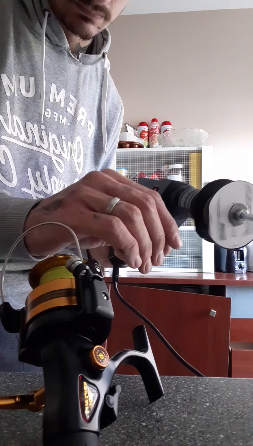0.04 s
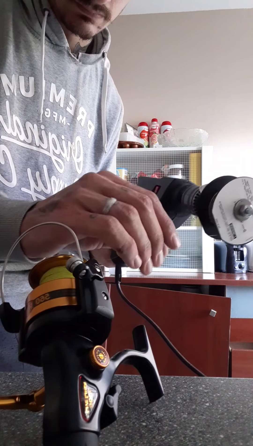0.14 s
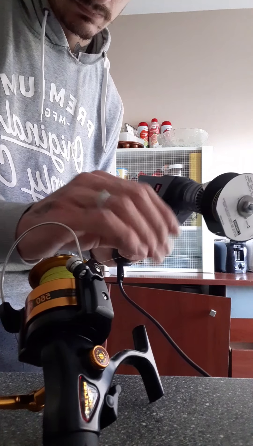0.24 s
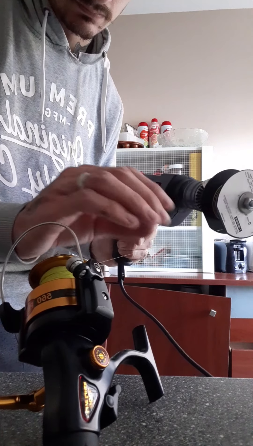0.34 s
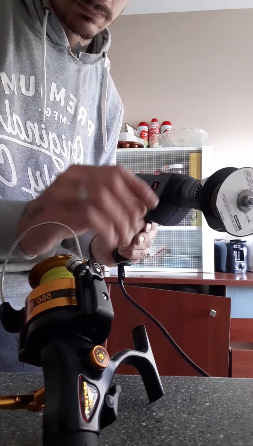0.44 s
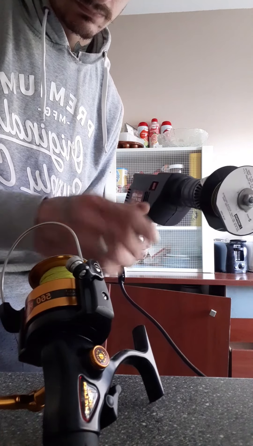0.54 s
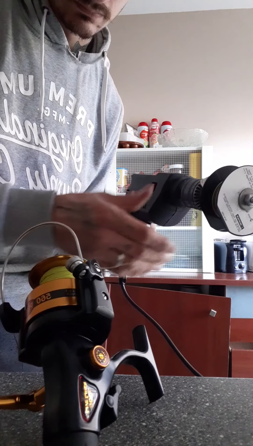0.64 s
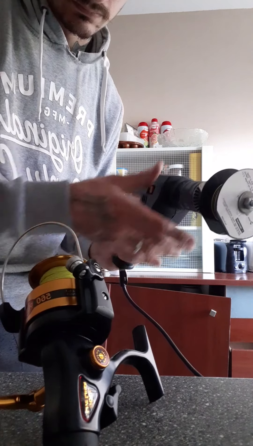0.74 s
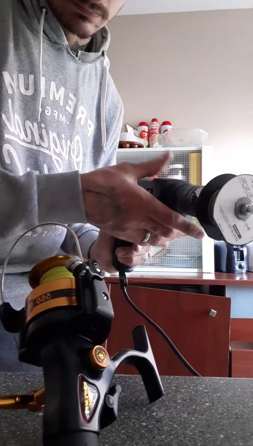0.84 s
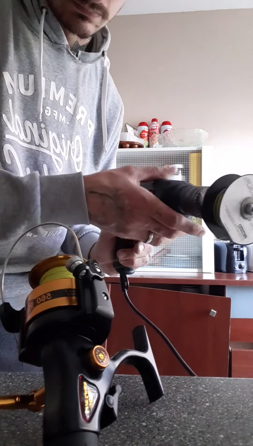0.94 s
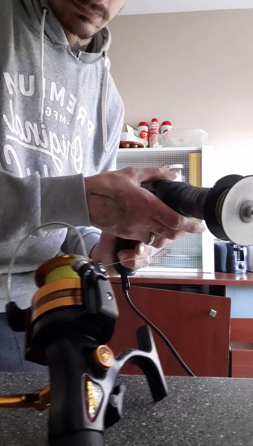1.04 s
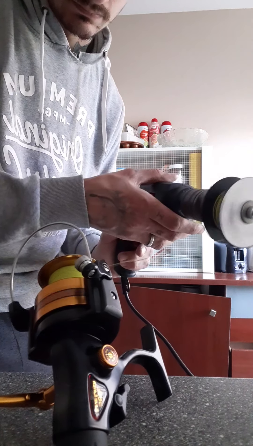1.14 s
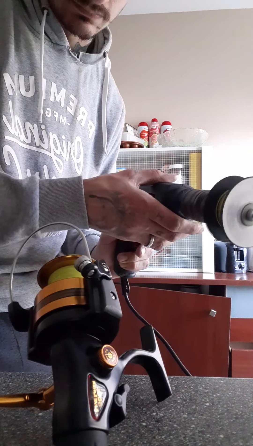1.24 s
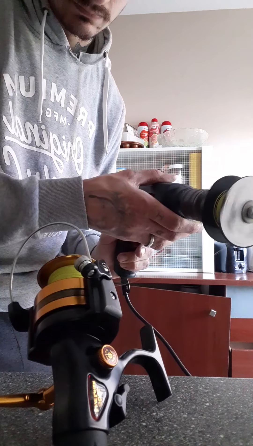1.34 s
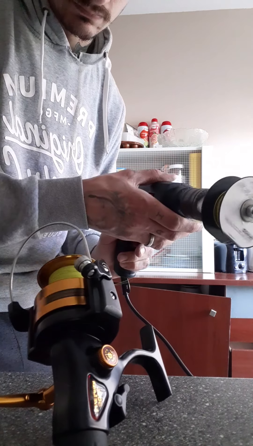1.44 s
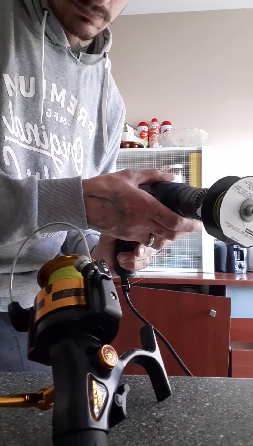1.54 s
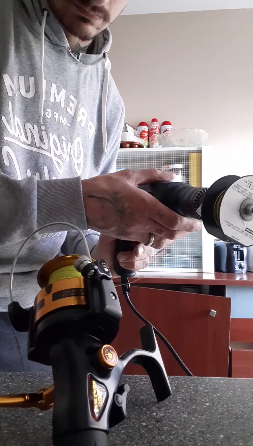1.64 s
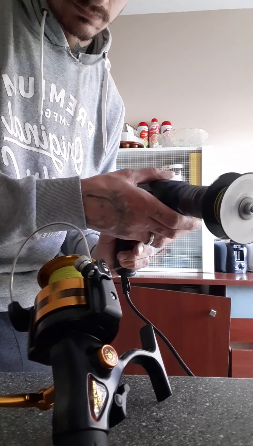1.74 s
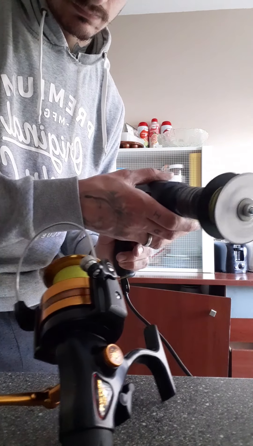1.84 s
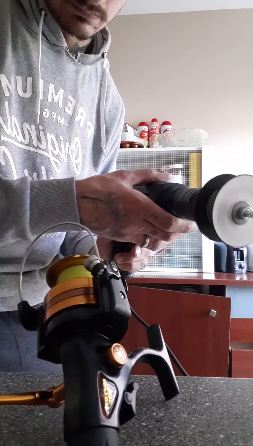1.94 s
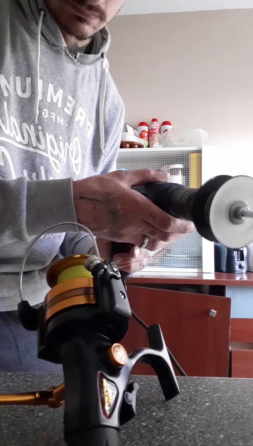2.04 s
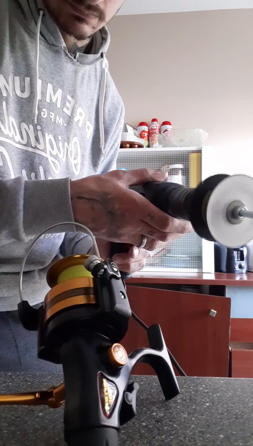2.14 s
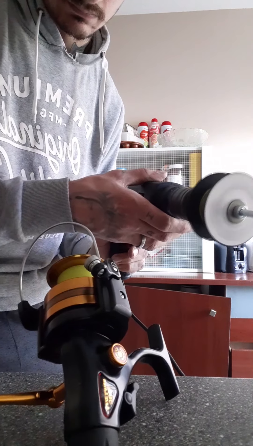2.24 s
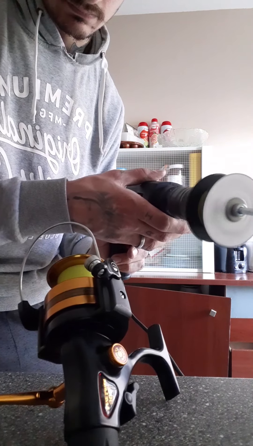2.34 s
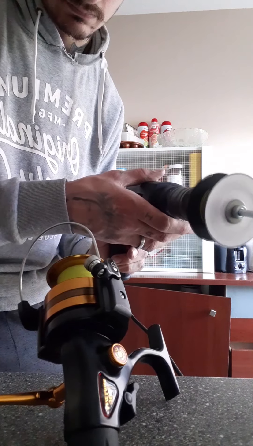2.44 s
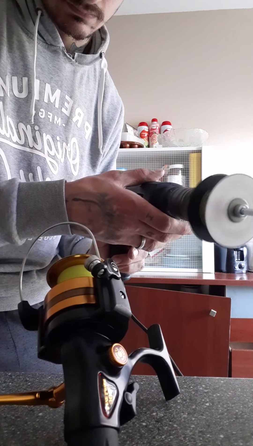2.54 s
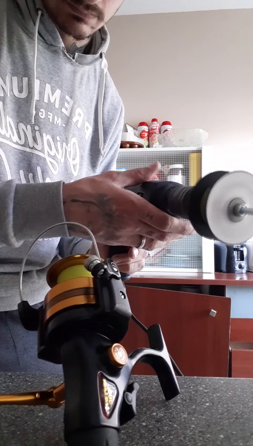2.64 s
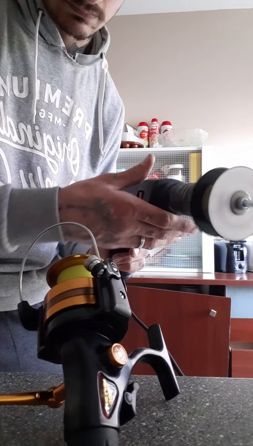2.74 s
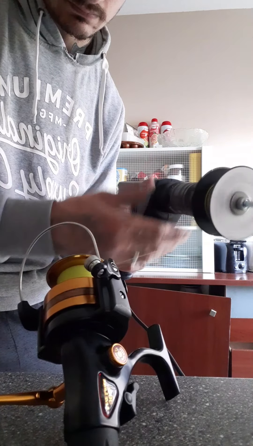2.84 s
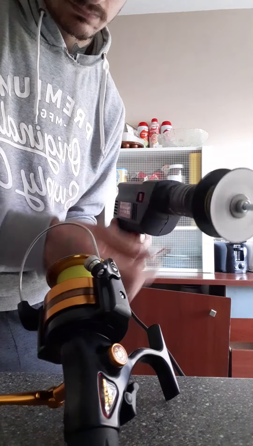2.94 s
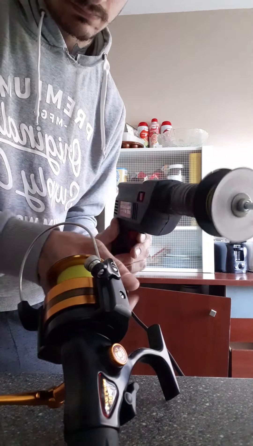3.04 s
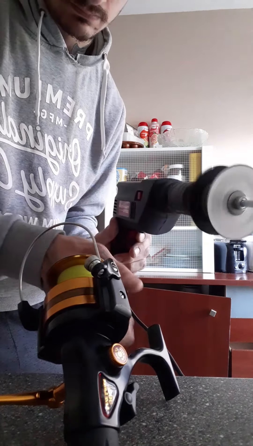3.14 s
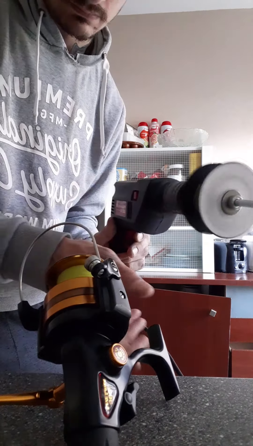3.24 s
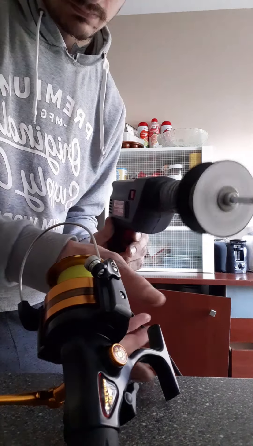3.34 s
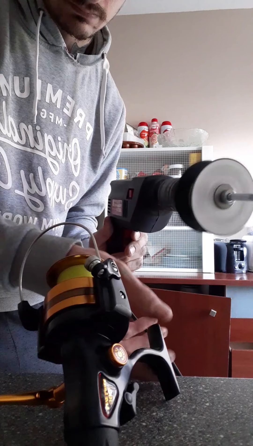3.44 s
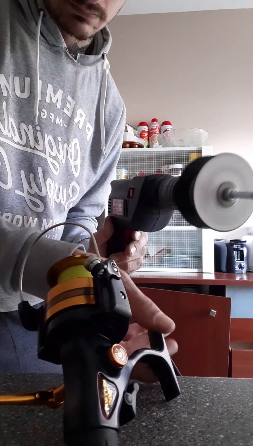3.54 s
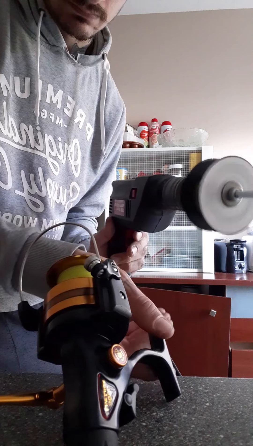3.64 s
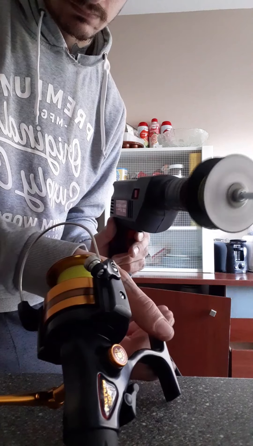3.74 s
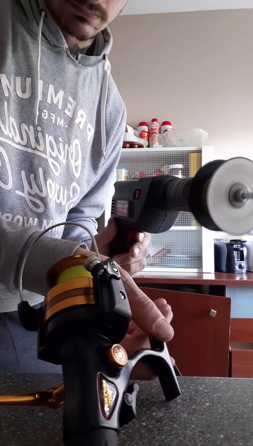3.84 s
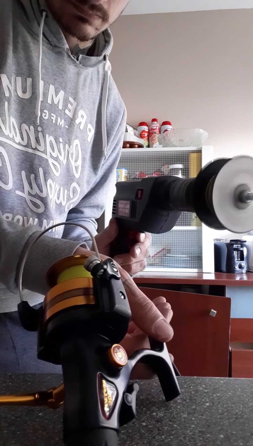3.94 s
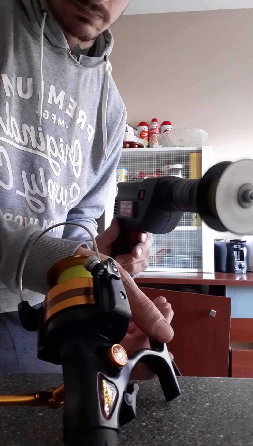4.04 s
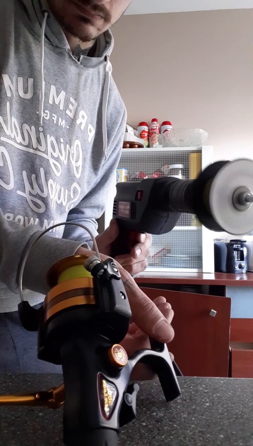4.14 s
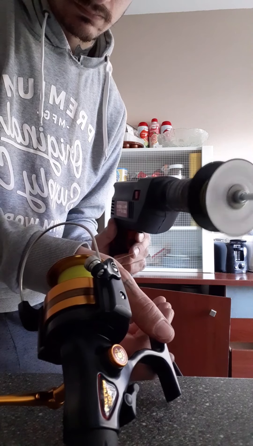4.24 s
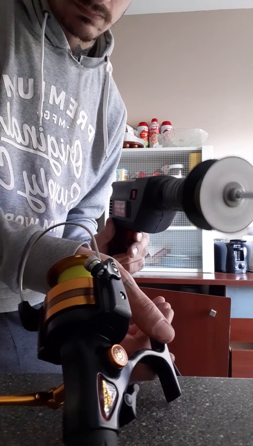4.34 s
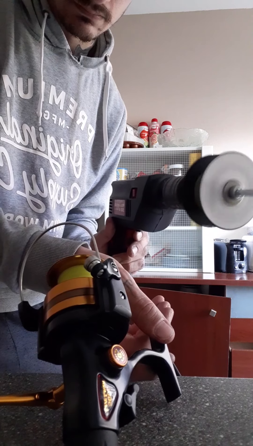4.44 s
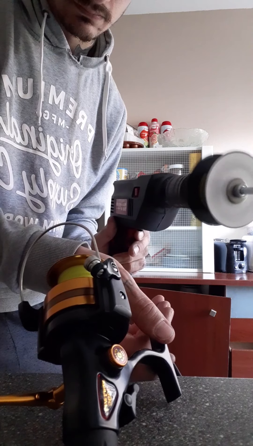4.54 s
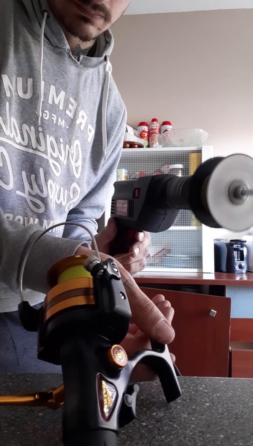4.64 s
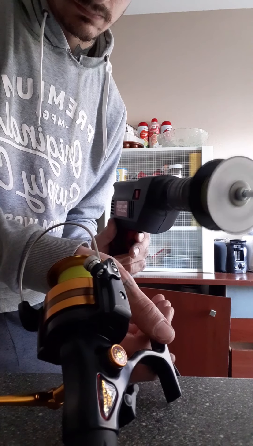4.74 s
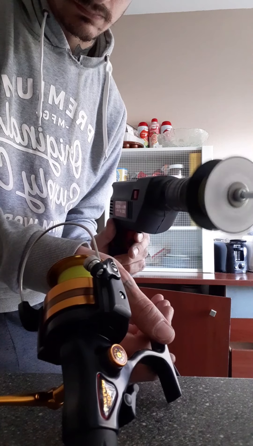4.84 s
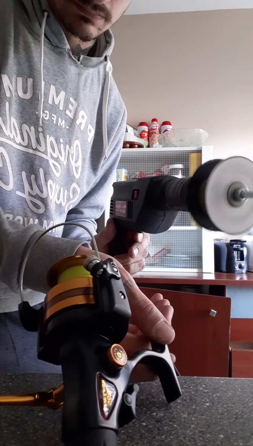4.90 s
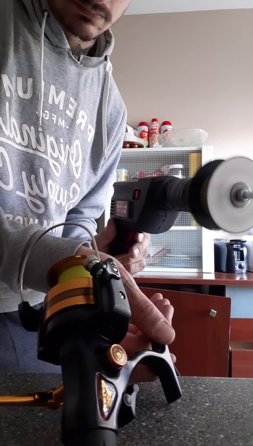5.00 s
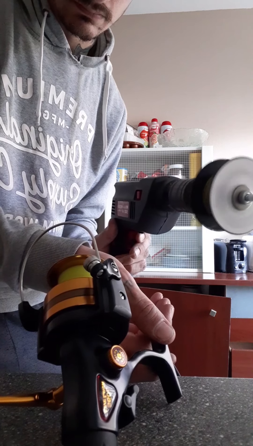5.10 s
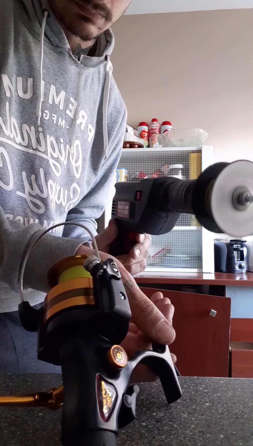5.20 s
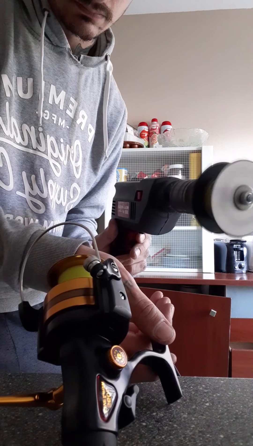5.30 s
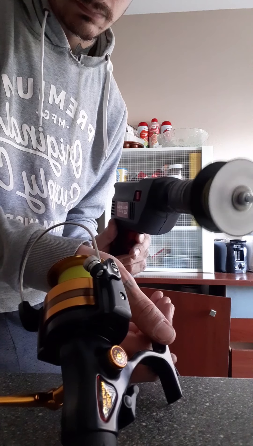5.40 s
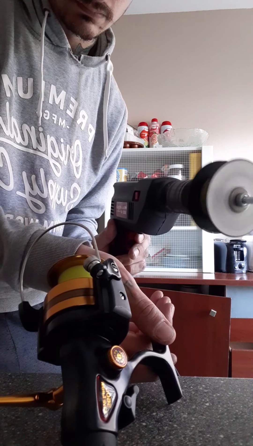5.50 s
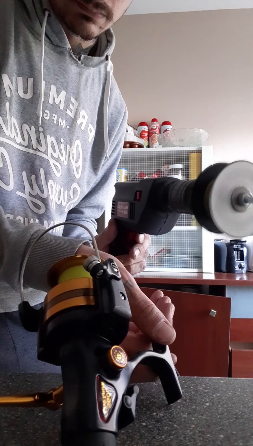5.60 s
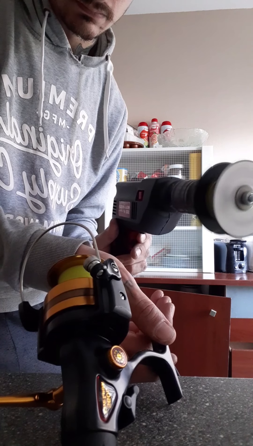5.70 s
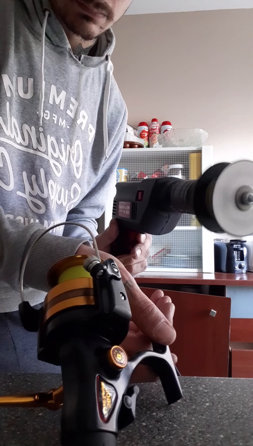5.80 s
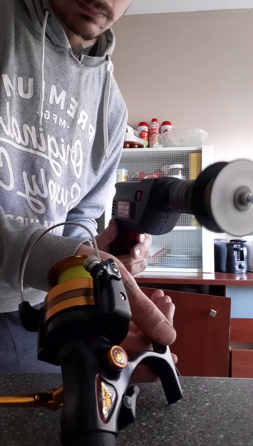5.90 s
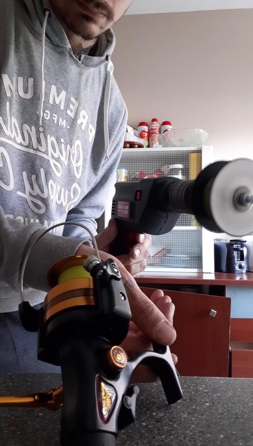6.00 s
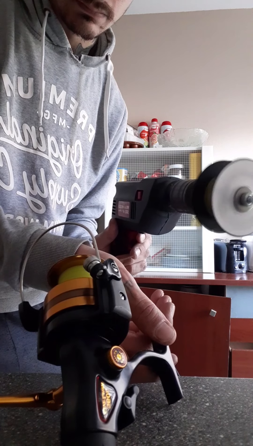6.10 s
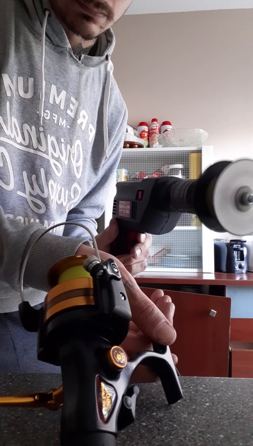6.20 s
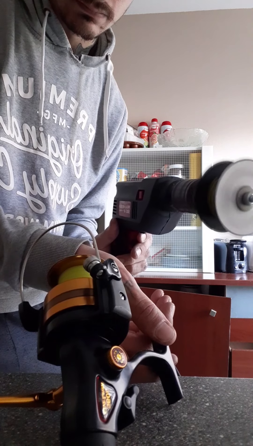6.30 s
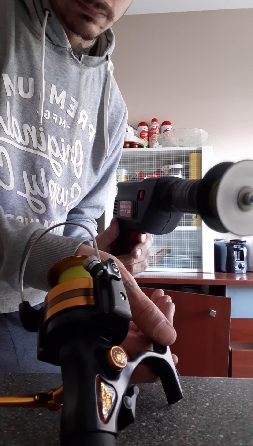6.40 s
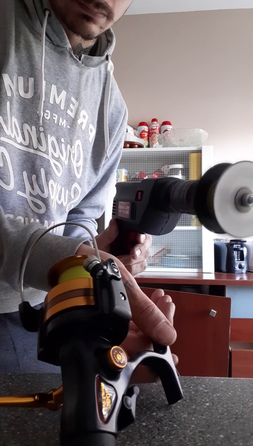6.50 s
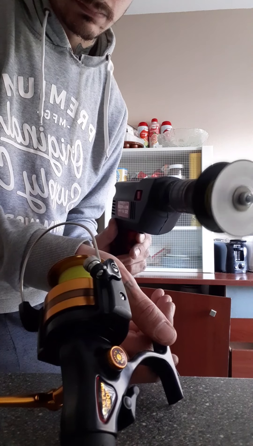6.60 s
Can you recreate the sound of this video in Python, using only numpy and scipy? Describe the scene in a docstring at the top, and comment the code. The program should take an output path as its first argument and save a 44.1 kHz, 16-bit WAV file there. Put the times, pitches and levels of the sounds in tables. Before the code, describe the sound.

A small quiet room, phone microphone close to a corded drill; the drill is in the right channel, only faint hiss in the left. At 0 s the motor is already coasting down, its rasp and falling whine thinning to sharp metallic tooth knocks by about 0.12 s. Quiet room tone follows, with a tiny trigger touch at 0.8 s. A dull slack rub at 0.95 s leads into a short rising whirr, peaking near 1.15 s and falling to separate ticks by 1.46 s. Another rub at 1.66 s, then from 1.73 s the drill spins up and stays on: gritty broadband scrape, bright wavering whine, ringing gears, fan rumble and rapid spool throb with small hoots. Pitch rises to 2.6 s, sags around 3.0 s, climbs again, dips briefly near 3.97 s, then holds high and slightly unsteady, edging upward, still running at about 6.6 s.

```python
"""A corded drill turns a spool of fishing line in a small room, close to a phone, over quiet air and hiss.
It opens coasting to rest: scraping, whining brushes and humming gears thin out to knocks of single teeth.
A finger settles on the trigger, a dull rub takes up slack, and one short burst spins up and coasts out.
Then the drill runs on: noise scrapes, bar-rate tones whine, gear tones swell through fixed resonances,
filtered friction rings a gear wheel and the case, and the off-centre spool hoots once a turn."""
import sys
import numpy as np
from scipy import signal
from scipy.fft import rfft, irfft
from scipy.io import wavfile
from scipy.ndimage import uniform_filter1d

SR = 44100
rng = np.random.default_rng(int(sys.argv[2]) if len(sys.argv) > 2 else 0)


def waveform_to_disk(signal):
    """Save audio, clipped to [-1, 1], as 16-bit WAV at the path in sys.argv[1]."""
    frames = np.transpose(np.atleast_2d(signal))
    scaled = np.clip(frames, -1, 1) * 32767
    samples = np.round(scaled).astype(np.int16)
    wavfile.write(sys.argv[1], SR, samples)


N = 293706
T = np.arange(N) / SR
HZ = np.maximum(np.arange(N // 2 + 1) * SR / N, 1)

# Levels in the right channel are set ahead of its final doubling; the left channel's hiss is not doubled.
# Spectra are relative shapes.
# quiet room spectrum: f/Hz, level per Hz/dB
AMBIENCE_SPECTRUM = [(18, -61.5), (30, -31.5), (90, -12), (124, -6.5), (149, -14), (221, -7), (336, -11.5),
                     (600, -16.5), (721, -4), (822, -14), (1860, -21), (5170, -21.5), (8300, -38.5),
                     (12600, -26), (16000, -22.5)]
# hiss of the idle left channel: f/Hz, level per Hz/dB
HISS_SPECTRUM = [(25, -5), (60, -4), (125, -1), (500, -9), (2000, -14.5), (5000, -17), (9000, -28),
                 (13000, -10), (16000, -18)]
# trigger pulls: pull t/s, end of spin-up t/s; the last one is held on
TRIGGER_PULLS = [(-.44, -.23), (.972, 1.155), (1.725, 1.9)]
# speed while the finger holds and eases the trigger: t/s, bar rate f/Hz
HELD_SPEED = [(1.9, 1513), (1.95, 1855), (2.06, 2278), (2.28, 3038), (2.55, 3655), (2.64, 3667),
              (3.04, 2089), (3.09, 2351), (3.28, 2932), (3.58, 3455), (3.8, 3592), (3.97, 2925),
              (4.01, 3388), (4.3, 3955), (4.51, 4137), (4.91, 4248), (4.99, 3967), (5.17, 3893),
              (5.41, 4125), (5.57, 4000), (5.93, 4378), (6.66, 4538)]
# commutator whine: multiple of the bar rate, level/dB, roughness 0-1
WHINE_LINES = [(1, -14, 0.44), (2, -10.5, 0.32), (3, -11.5, 0.48), (4, -14, 0.9)]
# how well the brush holders pass the whine to the housing: f/Hz, level/dB
HOLDER_RESPONSE = [(1500, -11), (2300, -7.5), (3000, -3), (4400, 3), (6300, 0), (7500, 2), (9000, -10.5),
                   (11000, -3.5), (13000, -1), (16000, -0.5)]
# what the housing radiates: f/Hz, level per Hz/dB
HOUSING_RESPONSE = [(300, -50.5), (600, -6.5), (1000, -5.5), (1400, -2.5), (2100, -3.5), (3000, -3.5),
                    (3700, 1), (4700, -2), (6800, -2), (8600, -8), (10300, -4), (11800, -0.5),
                    (13500, -1.5), (16000, -7.5)]
# housing resonances: f/Hz, width f/Hz, level relative to the broad response/dB
HOUSING_MODES = [(777, 87, -14), (2600, 28, 4), (2918, 188, 3), (3155, 40, 4), (4870, 310, 0.5),
                 (5710, 410, -0.5), (14400, 970, -4.5)]
# the clearest knocks of gear teeth at low speed: t/s, level ahead of filtering/dB
TOOTH_KNOCKS = [(0.0044, -15), (0.0246, -14.5), (0.0832, -21.5), (0.1222, -22.5), (0.9963, -23.5),
                (1.0168, -20.5), (1.3674, -18), (1.3854, -18), (1.4045, -14.5), (1.428, -15), (1.4599, -19),
                (1.7434, -25), (1.7818, -15.5)]
# cooling fan and shaking body: f/Hz, level per Hz/dB
RUMBLE_SPECTRUM = [(25, -29), (48, -20.5), (65, -5.5), (100, -3), (125, -4), (165, -5), (240, 3),
                   (300, -2.5), (380, 1), (520, -3), (800, -4), (1600, -37.5)]
# gear and armature tones: multiple of the motor turn, level/dB
GEAR_TONES = [(2.4, -21.5), (5, -19), (10, -24.5), (12, -21), (17, -22)]
# fixed gearbox resonances that the gliding tones pass through: f/Hz, level/dB
GEARBOX_RESPONSE = [(150, -26), (350, -8), (500, -13), (660, -6), (750, -1), (820, -5), (860, -14),
                    (915, 1), (960, 0), (1050, -11), (2000, -7), (2200, -3), (3000, -3)]
# a finger settles on the trigger: t/s, level ahead of filtering/dB
TRIGGER_TOUCH = [(.815, -63)]
# the dull rub of the motor taking up slack: t/s, level ahead of filtering/dB
SLACK_RUBS = [(.951, -42), (.966, -42.5), (1.659, -50.5), (1.672, -41), (1.705, -38)]

AMBIENCE_DB, HISS_DB = -70.5, -78.5
BARS, GEAR_RATIO, TEETH = 24, 9.6, 23  # commutator bars, motor turns per spool turn, output teeth
# speed counts commutator bars passing a brush; a pull draws it towards PULL_HZ, friction brakes it evenly
PULL_HZ, SPIN_UP_S, COAST_HZ_PER_S = 1979, .115, 4300
# bar rate to which the growth laws refer
CRUISE_HZ = 4200
# the scrape grows quickly up to a knee speed and slowly beyond it
SCRAPE_DB, SCRAPE_KNEE_HZ, SCRAPE_POWER = -19, 1073, 0.34
# scrape boost under full pull, and equal cut while coasting
DRIVE_DB = 0.5
# the whine rides on the scrape, stands out more with speed and wavers slowly
WHINE_DB, WHINE_POWER, WHINE_WAVER_DB = -5, 0.28, 1.1
# the bearings rumble evenly from this bar rate on
BEARING_DB, BEARING_HZ = -55.5, 600
# fan level at cruising speed, its growth with speed and its flutter
FAN_DB, FAN_POWER, FAN_FLUTTER_DB = -44, 2.27, 1.86
# a second hand steadies the drill at first; the fan's rumble is stronger until it lets go
HAND_OFF_S, HAND_FADE_S, HAND_DB = 2.8, .06, 3.5
# the body shudders as the motor gathers speed, most strongly this long after a pull
SHUDDER_DB, SHUDDER_S = -43.5, 0.1
# growth of the gear tones and of the spool's hoot with speed
GEAR_POWER, THROB_POWER = 0.75, 0.23
TOP_HZ = 15900  # top of the phone's passband


def undb(db):
    """Turn decibels into gain."""
    return 10 ** (np.asarray(db) / 20)


def unit(x):
    """Scale to a standard deviation of 1."""
    return x / np.std(x)


def noise():
    """White noise with rms 1."""
    return rng.standard_normal(N)


def curve(rows, axis=1):
    """Join one column of a table by straight lines in time."""
    rows = np.array(rows)
    return np.interp(T, rows[:, 0], rows[:, axis])


def walk(rate):
    """Smooth random drift with spread 1, mostly slower than `rate` in Hz."""
    points = 2 ** 14
    t = np.linspace(0, T[-1], points)
    hz = np.arange(points // 2 + 1) / T[-1]
    spectrum = rfft(rng.standard_normal(points)) / (1 + (hz / rate) ** 4)
    return np.interp(T, t, unit(irfft(spectrum)))


def response(points):
    """Draw a gain curve through f/Hz, level/dB points on a logarithmic frequency axis."""
    hz, db = np.transpose(points)
    return undb(np.interp(np.log(HZ), np.log(hz), db))


def resonance(hz, width_hz):
    """Response of one damped mode, gain 1 at its centre."""
    return 1 / (1 + 1j * (HZ ** 2 - hz ** 2) / (HZ * width_hz))


def colour(x, gain):
    """Filter by a response, keeping the power of white noise."""
    level_gain = gain / np.sqrt(np.mean(np.abs(gain) ** 2))
    # centre the impulse response, so that the filter adds no delay
    kernel = np.roll(irfft(level_gain, N), 8192)[:16385]
    return signal.fftconvolve(x, kernel, mode="same")


def bursts(rows, decay_s):
    """Place a dying noise burst at each t/s, level/dB row."""
    envelope = np.zeros(N)
    for s, db in rows:
        start = max(int(s * SR), 0)
        envelope[start:] += undb(db) * np.exp(-np.minimum(T[:N - start] / decay_s, 50))
    return envelope * noise()


def ambience():
    """The quiet room is steady noise with its own spectrum."""
    return undb(AMBIENCE_DB) * colour(noise(), response(AMBIENCE_SPECTRUM))


def hiss():
    """The idle channel carries only faint steady noise."""
    return undb(HISS_DB) * colour(noise(), response(HISS_SPECTRUM))


def speed():
    """Bar rate: each pull spins the motor up, then it coasts to rest; on the last pull the finger steers it."""
    hz = np.zeros(N)
    for pull, release in TRIGGER_PULLS:
        driven = PULL_HZ * (1 - np.exp(-np.clip(T - pull, 0, release - pull) / SPIN_UP_S))
        hz = np.maximum(hz, driven - COAST_HZ_PER_S * np.maximum(T - release, 0))
    return np.where(T < HELD_SPEED[0][0], hz, curve(HELD_SPEED))


def effort(bar_hz):
    """Towards +1 while the motor pulls hard, 0 at steady speed, -1 while it coasts."""
    gaining = uniform_filter1d(np.gradient(bar_hz) * SR, size=4096)
    return np.clip(gaining / COAST_HZ_PER_S, -1, 1)


def scrape(turns, bar_hz, slap_db, grain_db, flicker_db):
    """Gritty friction that surges as each output tooth engages, most deeply at low speed."""
    tooth = turns * TEETH / GEAR_RATIO
    size = undb(4.8 * rng.standard_normal(4096))[tooth.astype(int)]
    surge = np.exp(-(tooth % 1) / .22)
    slap = undb(slap_db) * size * surge / (1 + bar_hz / 2500)
    # each grain of grit lasts 8 samples
    grain = np.repeat(rng.standard_normal(N // 8 + 1), 8)[:N]
    grit = undb(grain_db * grain)
    return unit(noise() * grit * (1 + slap)) * undb(flicker_db * walk(41.7))


def whine(turns, bar_hz, jitter, uneven, patchy_db):
    """Brushes tick over the bars; uneven bars and bounce spread each line into a skirt, most at low speed."""
    bounce = np.clip(1.25 - bar_hz / 4200, 0, .7)
    phase = 2 * np.pi * BARS * turns + jitter * walk(30) + .7 * bounce * walk(80)
    runout = 1 + uneven * np.cos(2 * np.pi * turns + 2 * walk(11))
    lines = 0
    for k, db, rough in WHINE_LINES:
        angle = k * phase
        in_step = (runout + rough * walk(170)) * np.sin(angle)
        out_of_step = rough * walk(170) * np.cos(angle)
        # the topmost lines stand out only once the brushes run smoothly
        smeared_db = 6 * bounce * np.clip((k * bar_hz - 8000) / 2000, 0, 1)
        lines = lines + undb(db - smeared_db + patchy_db * walk(16)) * (in_step + out_of_step)
    return colour(np.sqrt(2) * lines, response(HOLDER_RESPONSE))


def housing(x):
    """The housing radiates the brushes through a broad response with added resonant modes."""
    modes = sum(undb(db) * resonance(hz, width) for hz, width, db in HOUSING_MODES)
    return colour(x, response(HOUSING_RESPONSE) * (1 + modes))


def tooth_knocks(knocks):
    """Single gear teeth strike as sharp cracks, brightest around 5.5 kHz."""
    bright = [(500, -16), (3800, -4.5), (5500, 9.5), (9000, -0.5), (13500, 4.5), (16000, -7)]
    return undb(-2) * colour(knocks, response(bright))


def wheel(friction, knocks, spool_turns, ring_db, low_ring_db):
    """A steel gear rings; its lobes sweep past the listener, so the tone splits in two as it spins."""
    lobes = np.sqrt(2) * np.cos(2 * np.pi * 4.5 * spool_turns)
    ring = colour(friction + undb(3.5) * knocks, resonance(7530, 34) * resonance(7440, 300))
    # the lower mode is damped while the teeth rub, and rings on freely after a knock
    rubbed = undb(low_ring_db) * colour(friction, resonance(4770, 150) * resonance(4770, 300))
    struck = undb(-11) * colour(knocks, resonance(4760, 16) * resonance(4760, 400))
    return undb(ring_db) * ring * lobes + rubbed + struck


def case_modes(friction):
    """The friction excites the lower modes of the case: a narrow drone and a broader tone."""
    drone = undb(-34.5) * colour(friction, resonance(429, 4.8) * resonance(500, 120))
    case = undb(-25.0) * colour(friction, resonance(1255, 200) * resonance(1284, 280))
    return drone + case


def rumble(bar_hz):
    """The bearings roll, the fan blows harder with speed, and the body shudders briefly after each pull."""
    rolling = undb(BEARING_DB) * np.minimum(bar_hz / BEARING_HZ, 1)
    steadied = (1 - np.tanh((T - HAND_OFF_S) / HAND_FADE_S)) / 2
    fan_db = FAN_DB + HAND_DB * steadied + FAN_FLUTTER_DB * walk(11)
    blowing = undb(fan_db) * (bar_hz / CRUISE_HZ) ** FAN_POWER
    ages = [np.maximum(T - pull, 0) / SHUDDER_S for pull, _ in TRIGGER_PULLS]
    shudder = undb(SHUDDER_DB) * sum((age * np.exp(1 - age)) ** 4 for age in ages)
    level = np.sqrt(rolling ** 2 + blowing ** 2 + shudder ** 2)
    return level * colour(noise(), response(RUMBLE_SPECTRUM))


def gears(turns, bar_hz, wobble, patchy_db):
    """Meshing tones swell in the resonances of the gearbox and throb with the spool."""
    tones = 0
    for k, db in GEAR_TONES:
        ring_db = np.interp(k * bar_hz / BARS, *np.transpose(GEARBOX_RESPONSE))
        angle = 2 * np.pi * k * turns + .4 * walk(25)
        tones = tones + undb(db + ring_db + patchy_db * walk(9.4)) * np.sin(angle)
    return np.sqrt(2) * tones * wobble * (bar_hz / CRUISE_HZ) ** GEAR_POWER


def throb(spool_turns, bar_hz, hz, db):
    """The off-centre spool loads the gearbox once a turn, and each time it gives a short bent hoot."""
    angle = 2 * np.pi * spool_turns
    swell = ((1 + np.sin(angle)) / 2) ** 2 * undb(2 * walk(12))
    bend = 1.6 * np.sin(angle + 1) + 1.2 * walk(14)
    tone = np.sin(2 * np.pi * hz * T + bend)
    return undb(db) * unit(swell * tone) * (bar_hz / CRUISE_HZ) ** THROB_POWER


def trigger_touch():
    """A finger settling on the trigger gives a tiny click through a broad resonance."""
    return colour(bursts(TRIGGER_TOUCH, decay_s=.006), resonance(4800, 2200) ** 2)


def slack_rubs():
    """The motor taking up slack rubs as slowly dying noise with little above 8 kHz."""
    dull = [(150, -22), (450, -4), (1250, 9), (2200, 3.5), (5200, 8.0),
            (8500, -13), (13000, -7), (16000, -13)]
    return colour(bursts(SLACK_RUBS, decay_s=0.17), response(dull))


def room(x, t60_s, wet_db):
    """Close walls return a short dense tail, which dies sooner in the treble."""
    t = T[:SR]
    low_pass = signal.butter(2, 6000, fs=SR, output="sos")
    high_pass = signal.butter(2, 6000, "high", fs=SR, output="sos")
    low = signal.sosfilt(low_pass, rng.standard_normal(SR)) * 1000 ** (-t / t60_s)
    high = signal.sosfilt(high_pass, rng.standard_normal(SR)) * 1000 ** (-t / (.8 * t60_s))
    tail = (low + high) * (t > .003)  # the walls answer after 3 ms
    wet = undb(wet_db)
    reflected = signal.fftconvolve(x, tail / np.linalg.norm(tail))[:N]
    return (x + wet * reflected) / np.hypot(1, wet)


def scene():
    """Motor speed drives the layers; the right channel carries the scene, the left only hiss."""
    bar_hz = speed()
    turns = np.cumsum(bar_hz) / SR / BARS
    spool_turns = turns / GEAR_RATIO
    wobble = 1 + .55 * np.sin(2 * np.pi * spool_turns)

    # near standstill the steady scrape gives way to single knocks
    knee = bar_hz / np.hypot(bar_hz, SCRAPE_KNEE_HZ)
    level = undb(SCRAPE_DB) * knee * (bar_hz / CRUISE_HZ) ** SCRAPE_POWER
    rubbing = scrape(turns, bar_hz, slap_db=2.5, grain_db=1.5, flicker_db=1.0)
    friction = level * undb(DRIVE_DB * effort(bar_hz)) * rubbing
    whine_gain = undb(WHINE_DB + WHINE_WAVER_DB * walk(3.7)) * (bar_hz / CRUISE_HZ) ** WHINE_POWER
    singing = level * whine_gain * whine(turns, bar_hz, jitter=0.22, uneven=0.26, patchy_db=3.0)
    brushes = housing(undb(-1.27) * friction + singing)

    knocks = bursts(TOOTH_KNOCKS, decay_s=.0018)
    ringing = wheel(friction, knocks, spool_turns, ring_db=-10.0, low_ring_db=-17.0)
    body = brushes + tooth_knocks(knocks) + ringing + case_modes(friction) + rumble(bar_hz)
    drill = room(body + trigger_touch() + slack_rubs(), t60_s=0.43, wet_db=-6)

    # the gearbox faces the phone, so its throbbing tones arrive dry
    hum = gears(turns, bar_hz, wobble, patchy_db=2.0)
    gearbox = level * (hum + throb(spool_turns, bar_hz, hz=1225, db=-22))
    return np.array([hiss(), 2 * (drill + gearbox + ambience())])


def record(dry):
    """The phone rounds the highest peaks and cuts the top."""
    rounded = dry / (1 + (dry / .85) ** 6) ** (1 / 6)
    top_cut = signal.ellip(10, .2, 70, TOP_HZ, fs=SR, output="sos")
    return signal.sosfilt(top_cut, rounded)


dry = scene()
out = record(dry)
waveform_to_disk(out)
```